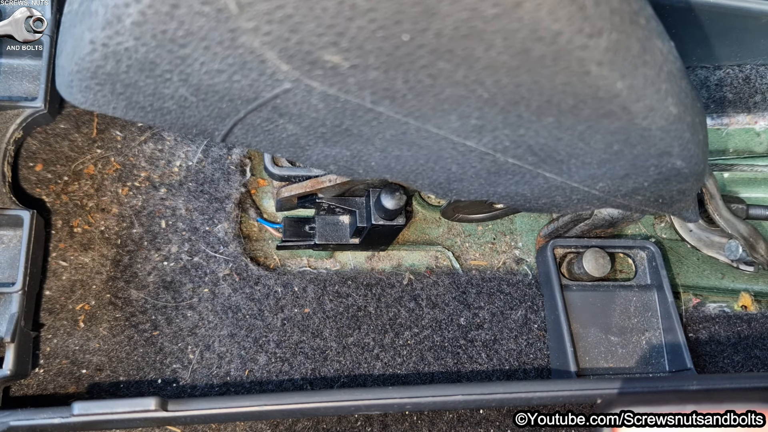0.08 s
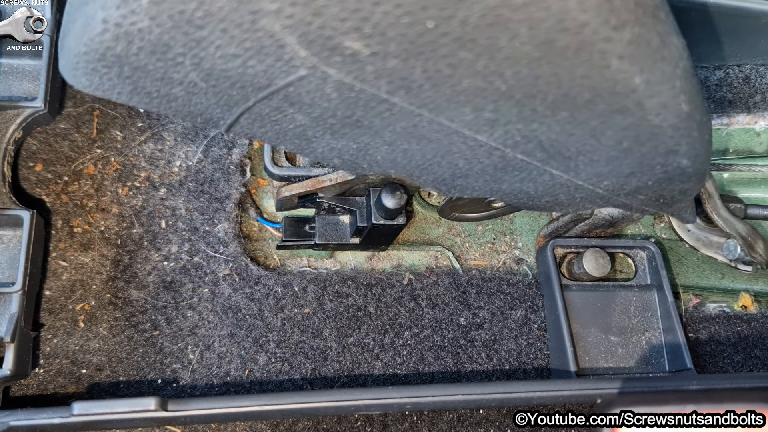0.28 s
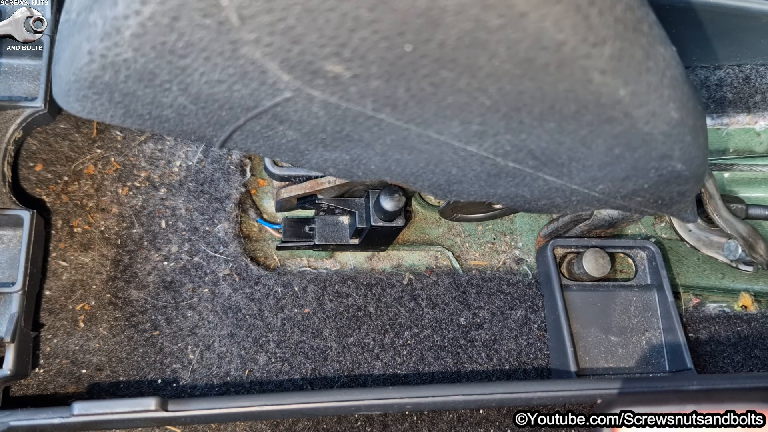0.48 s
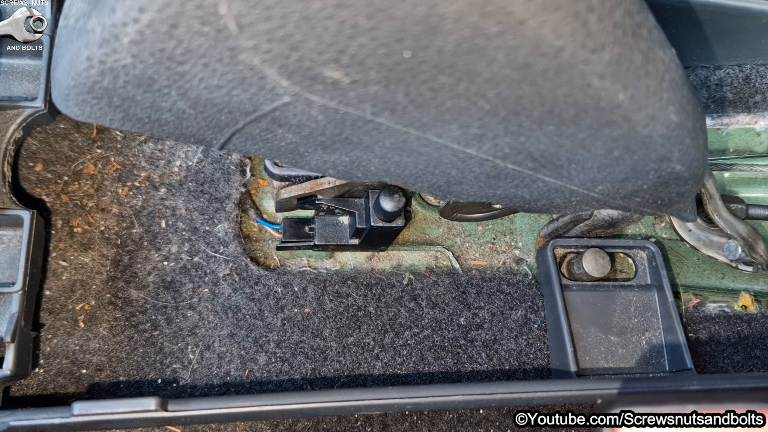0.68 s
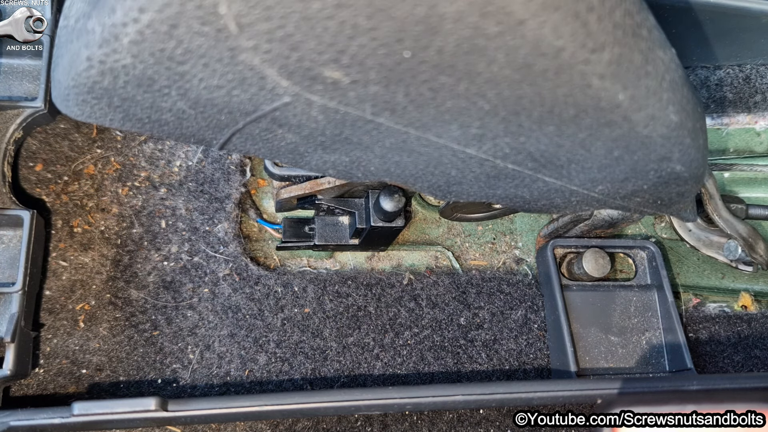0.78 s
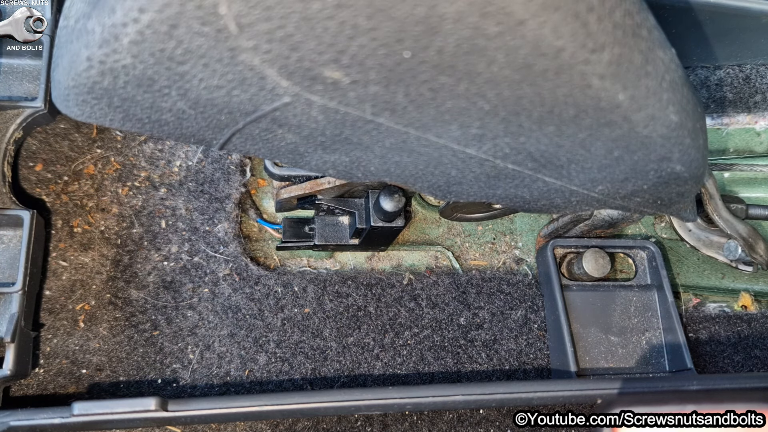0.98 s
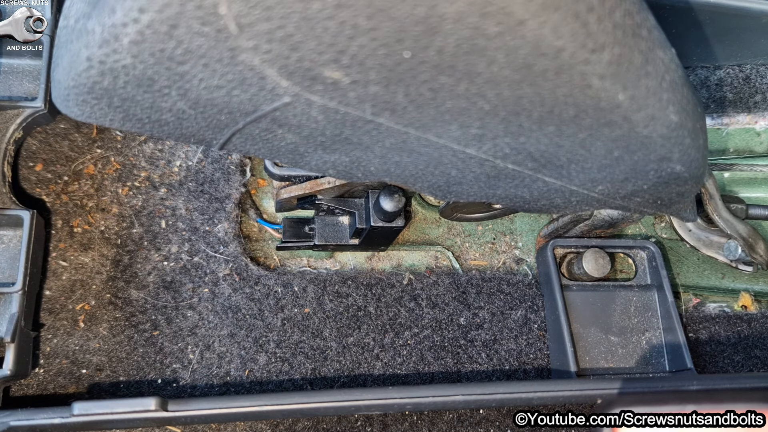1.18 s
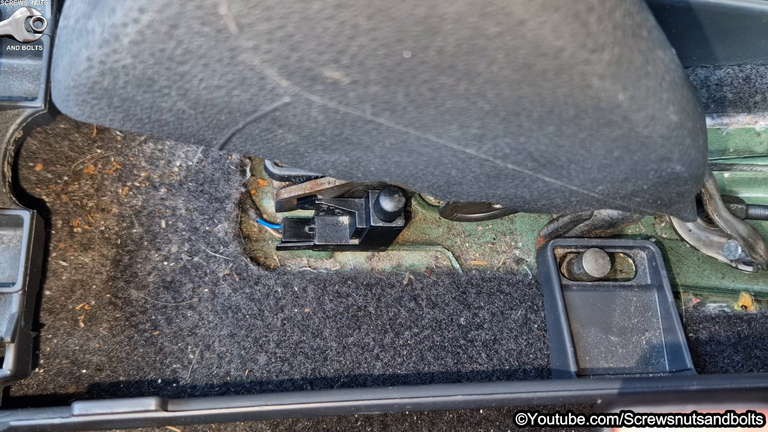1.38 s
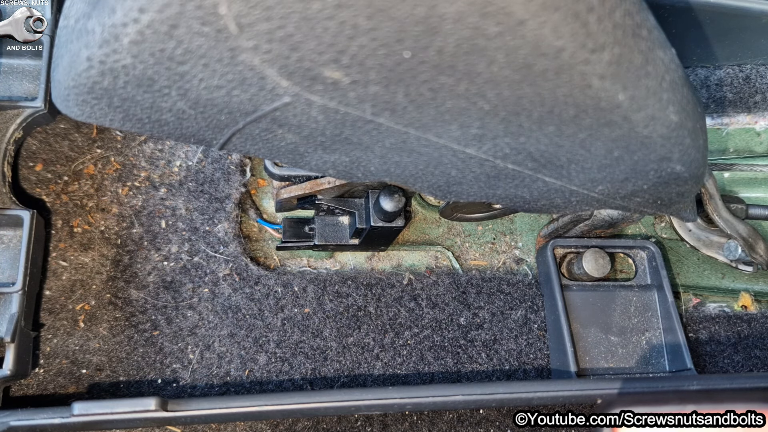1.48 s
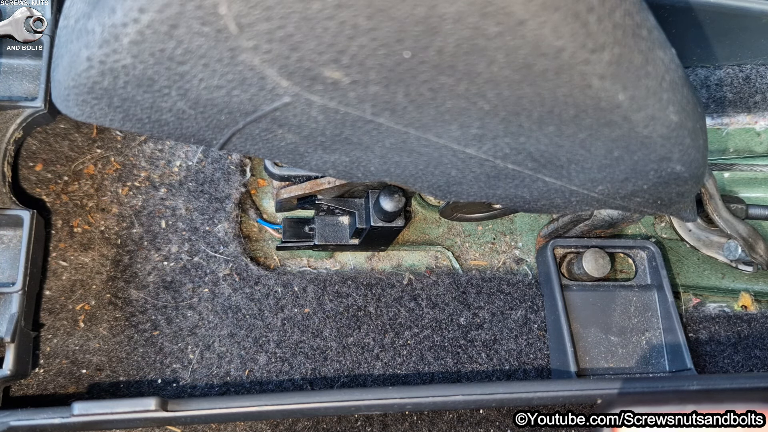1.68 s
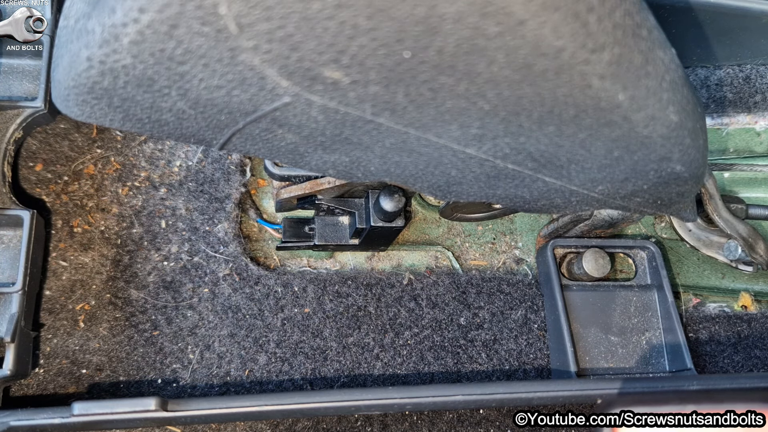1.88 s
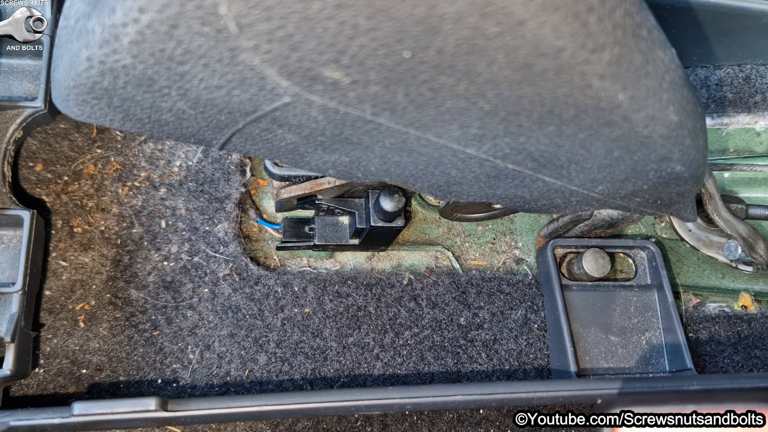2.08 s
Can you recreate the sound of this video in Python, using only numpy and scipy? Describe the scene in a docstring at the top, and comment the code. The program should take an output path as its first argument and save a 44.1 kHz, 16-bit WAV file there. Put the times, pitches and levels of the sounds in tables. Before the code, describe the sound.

A car handbrake lever snaps with a loud, sharp double metallic clack and short thud, then a duller knock, then a few faint cable and linkage ticks, heard close in a small quiet cabin.

```python
"""A car handbrake lever is worked, heard close up from the floor of the cabin.
Pawl, sector, stop, cable and link click as noise bursts shaped by each part's resonances, with a cabin tail;
damped low pushes thud into the modes of the floor pan. Sliding friction is swelling, grainy noise,
and friction in the lever mount is narrow-band low noise. Beneath lie a drifting rumble and steady hiss."""
import sys
import numpy as np
from scipy import signal
from scipy.fft import rfft, irfft
from scipy.io import wavfile
from scipy.ndimage import uniform_filter1d

SR = 44100
rng = np.random.default_rng(int(sys.argv[2]) if len(sys.argv) > 2 else 0)


def master_out(mix):
    """Clip the mix to full scale and print it as 16-bit PCM to the path in sys.argv[1]."""
    frames = np.transpose(np.atleast_2d(mix))
    ceiling = np.clip(frames, -1, 1)
    pcm = np.round(ceiling * 32767).astype(np.int16)
    wavfile.write(sys.argv[1], SR, pcm)


N = 92610  # samples in the scene

# corner frequencies of the tonal balance of clicks and rubbing
BODY_HZ, MID_HZ, TREBLE_HZ, TOP_HZ = 574, 2020, 6800, 12300


def amp(db):
    """Logarithmic level: converts decibels to a gain in amplitude."""
    return 10 ** (np.asarray(db) / 20)


def evened(x):
    """Power normalisation: scales to unit rms."""
    return x / np.sqrt(np.mean(x ** 2) + 1e-20)


def read(points, hz):
    """Logarithmic pitch: interpolates a table along a log-frequency axis."""
    f, value = np.transpose(points)
    return np.interp(np.log(hz + 1), np.log(f + 1), value)


def add(mix, start_s, sound):
    """Superposition: adds a sound to the mix from a given time, cut at the end of the mix."""
    part = mix[:, round(start_s * SR):][:, :sound.shape[-1]]
    part += sound[..., :part.shape[1]]


def noise(size):
    """Spatial coherence: white-noise spectra at two microphones, most alike in the bass."""
    # likeness of left and right: hz, correlation
    likeness = [(30, 1), (250, .97), (620, 0.64), (1300, -0.18), (2600, -.25), (5000, .15), (16000, .05)]
    hz = np.fft.rfftfreq(size, 1 / SR)
    a, b = rfft(rng.standard_normal((2, size)))
    same = np.clip(read(likeness, hz), -1, 1)
    mid = a * np.sqrt((1 + same) / 2)
    side = b * np.sqrt((1 - same) / 2)
    return hz, np.array([mid + side, mid - side])


def rings(part, hz):
    """Modal resonance: summed peaks and dips of one part, in decibels."""
    # resonances of each part: centre_hz, width_hz, boost_db
    resonances = {"pawl": [(370, 74, 3), (1390, 510, 11.5), (2700, 190, 1.5), (3580, 110, 13),
                  (4060, 420, 1.5), (4950, 250, 14.5), (5900, 210, 5.5), (6200, 500, -7.5), (7500, 500, 8)],
                  "sector": [(665.2, 140, 8.5), (913, 70, 7), (1403, 300, 4.5), (2200, 200, 7),
                  (3127, 510, 6), (3240, 58, 5), (4600, 400, -0.5), (5639, 73, 7), (6400, 180, 7),
                  (7992, 360, -1), (12000, 590, 9)], "stop": [(593, 135, 4), (1244, 160, 6.5),
                  (1636, 115, 7.5), (1896, 210, 11.5), (2920, 570, 10), (3880, 160, -12), (4100, 240, 19),
                  (5610, 155, 10.5), (6300, 220, -4), (7520, 210, 14.5)], "cable": [(656, 99, 15),
                  (1190, 110, 14), (2130, 1240, -20), (2850, 370, 20.5), (3316, 415, -10), (4030, 67, 13.5),
                  (4200, 130, 14), (4660, 320, -25.5), (5530, 220, 8.5), (7700, 720, 12), (8580, 405, 6)],
                  "link": [(1282, 74, 11), (1650, 120, 15.5), (1874, 305, -37), (2266, 310, 23),
                  (3180, 250, 5.5), (4150, 240, 11.5), (7450, 800, 9.5), (9600, 900, 4)],
                  "trim": [(1407, 200, 10), (1620, 170, 15), (2600, 250, -15.5), (4375, 230, -4),
                  (5404, 200, 6.5), (6444, 250, -9)]}
    return sum(db / (1 + (2 * (hz - f) / width) ** 2) for f, width, db in resonances[part])


def strike(z, envelope):
    """Energy normalisation: noise of spectrum z under an envelope, at a power set by the two."""
    wave = irfft(z)
    return evened(wave * envelope) * np.sqrt(np.mean(wave ** 2) * np.mean(envelope ** 2))


def rumble():
    """Broadband noise: a low rumble drifts in level under a steady trace of hiss."""
    # relative spectrum per hertz: hz, level_db
    spectrum = [(20, -11), (50, -1.5), (72, -3.5), (105, -20.5), (150, -26), (240, -28.5), (330, -37.5),
                (480, -45.5), (620, -38.5), (1050, -44.5), (1700, -43), (2200, -48.5), (4000, -55),
                (8000, -63), (16000, -67.5)]
    # drift of the low part: time_s, gain_db
    drift_points = [(0, -56.5), (0.399, -52.5), (.62, -51.5), (.76, -59), (1.1, -51.5), (1.45, -55),
                    (1.65, -59.5), (1.901, -60), (2.05, -49.5)]
    edge_hz, hiss_gain_db = 200, -55
    hz, z = noise(size=N)
    z = z * evened(amp(read(spectrum, hz)))
    low = 1 / (1 + (hz / edge_hz) ** 2)
    drift = amp(np.interp(np.arange(N) / SR, *np.transpose(drift_points)))
    hiss = amp(hiss_gain_db) * irfft(z * (1 - low), N)
    return drift * irfft(z * low, N) + hiss


def groan(peak_s, half_s, gain_db, centre_hz):
    """Structure-borne friction: dull narrow-band noise carried by the floor pan swells and fades."""
    width_oct = 0.4  # standard deviation of the band
    hz, z = noise(size=N)
    band = np.exp(-.5 * (np.log2((hz + 1) / centre_hz) / width_oct) ** 2)
    swell = np.exp(-.5 * ((np.arange(N) / SR - peak_s) / half_s) ** 2)
    return evened(irfft(z * band, N)) * amp(gain_db) * swell


def rub(turn_s, part, rise_s, fall_s, gain_db, body_db):
    """Sliding friction: grainy noise, coloured by the part, swells and dies away."""
    # relative spectrum per hertz: hz, level_db
    spectrum = [(60, -10), (300, 4), (900, -2), (1600, 1.5), (2600, -1.5), (4000, -2), (8000, -3),
                (11000, -8.5), (16000, -7.5)]
    ring_share = .5  # share of the part's resonances, in decibels
    grain_db, grain_s = 2, .003  # rms fluctuation in level, averaging time
    hz, z = noise(size=N)
    t = np.arange(N) / SR - turn_s
    colour = evened(amp(read(spectrum, hz) + ring_share * rings(part, hz)))
    balance = amp(read([(BODY_HZ, body_db), (TREBLE_HZ, 0)], hz))
    grain = evened(uniform_filter1d(rng.standard_normal(N), max(1, round(grain_s * SR))))
    # exponential rise before the turn and exponential fall after it, joined smoothly
    swell = 2 * np.exp(-np.logaddexp(-t / rise_s, t / fall_s))
    return irfft(z * colour * balance, N) * swell * amp(gain_db + grain_db * grain)


def thud(gain_db, push_hz, t60_s):
    """Modal excitation: a damped push through the lever mount wakes pan modes, most near its pitch."""
    # floor pan and cabin modes: mode_hz, relative_db, t60_s
    modes = [(44, -11.5, .6), (66, -17.5, 0.62), (96.6, -11, .28), (142, -15, .3), (190.5, -7.5, .21),
             (237.4, -7, 0.17), (285, -11, 0.16), (329, -20.5, .19), (369, -20.5, .17), (632, -28.5, .16)]
    pan_gain_db, spread_oct, build_s = -6.5, 2.8, 0.055
    t = np.arange(SR) / SR
    onset = np.minimum(t * push_hz * 2, 1)  # full after half a cycle
    push = np.sin(2 * np.pi * push_hz * t) * amp(-60 * t / t60_s) * onset
    pan = 0
    for f, db, decay_s in modes:
        coupling = 1 / (1 + (np.log2(f / push_hz) / spread_oct) ** 2)
        pan = pan + coupling * amp(db - 60 * t / decay_s) * np.sin(2 * np.pi * f * t)
    build = 1 - np.exp(-t / build_s)
    return amp(gain_db) * (push + amp(pan_gain_db) * pan * build)


def click(part, gain_db, body_db, treble_db, top_db, t60_s, left_right_db):
    """Impact: steel strikes steel, dense modes ring briefly, then the cabin carries a faint tail."""
    # relative spectrum of the steel per hertz: hz, level_db
    steel = [(40, -24.5), (150, -3), (330, 8), (700, 4.5), (1050, -3.5), (1400, -0.5), (2500, -5),
             (4000, -4.5), (6200, -0.5), (9500, -9), (12000, -14), (16000, -15)]
    # cabin tail before its decay: hz, relative_db
    cabin_level = [(150, -12), (500, -21.5), (2000, -21), (6000, -29.5), (14000, -26.5)]
    # decay of the cabin tail: hz, t60_s
    cabin_decay = [(150, .27), (500, .16), (2000, .17), (6000, .135), (14000, .11)]
    attack_s, body_attack_s = .0005, .001  # the second is added in the bass
    body_ring = 1.3  # the ring lasts longer in the bass by up to this factor
    crack_gain, crack_s = 0.63, .0007  # the first contact stands out above the ring
    tail_ring = .4  # share of the part's resonances, in decibels, heard in the tail

    hz, z = noise(size=16384)
    t = np.arange(2 * (len(hz) - 1)) / SR
    balance = [(BODY_HZ, body_db), (MID_HZ, 0), (TREBLE_HZ, treble_db), (TOP_HZ, top_db)]
    z = z * amp(read(balance, hz))
    near = z * evened(amp(read(steel, hz) + rings(part, hz)))
    far = z * evened(amp(read(steel, hz) + tail_ring * rings(part, hz)))

    centres = np.geomspace(125, 16000, 8)
    out = 0
    for f, share in zip(centres, np.eye(len(centres))):
        band = read(np.c_[centres, share], hz)  # overlapping triangular bands that sum to one
        heavy = 1 / (1 + (f / BODY_HZ) ** 2)  # near one in the bass, zero in the treble
        rise = np.minimum(t / (attack_s + body_attack_s * heavy), 1)
        ring = amp(-60 * t / (t60_s * (1 + (body_ring - 1) * heavy)))
        crack = 1 + crack_gain * (1 - heavy) * np.exp(-t / crack_s)
        tail = amp(read(cabin_level, f) - 60 * t / read(cabin_decay, f))
        direct = strike(near * band, rise * ring * crack)
        reverberant = strike(far * band, rise * (1 - ring) * tail)
        out = out + direct + reverberant
    return out * amp(gain_db + np.array([[left_right_db], [-left_right_db]]) / 2)


def scene():
    """Superposition of sources: clicks, thuds and friction over the rumble."""
    # low rubbing of the lever in its mount: peak_s, half_s (standard deviation), gain_db, centre_hz
    groans = [(0.18, 0.0057, -58, 310), (0.433, 0.033, -61, 240), (0.96, 0.093, -63, 231),
              (1.657, 0.15, -70.5, 142.4), (0.62, 0.034, -47, 59)]
    # rubbing strokes: turn_s (from rise to fall), part, rise_s, fall_s, gain_db, body_db
    rubs = [(0.216, "pawl", 0.021, 0.005, -64.5, 11.5), (0.251, "sector", .009, .003, -29, -1),
            (0.489, "stop", 0.0072, 0.0051, -62.5, 16), (0.907, "cable", 0.023, 0.014, -61.5, -3),
            (.948, "cable", 0.005, .015, -65.5, 3.5), (0.997, "link", 0.0045, .012, -56, -42),
            (1.032, "link", 0.026, 0.037, -66, 4.5), (1.598, "trim", 0.018, 0.027, -61.5, -6.5),
            (1.71, "trim", 0.034, 0.041, -74, 1)]
    # blows into the floor pan: start_s, gain_db, push_hz, t60_s
    thuds = [(.2148, -26, 380, 0.019), (0.2355, -12, 300, 0.025), (0.2441, -22, 260, 0.06),
             (0.252, -11.5, 235, 0.028), (0.2784, -27.5, 230, 0.058), (0.4919, -25.5, 420, 0.016),
             (0.4974, -22, 103.2, 0.092), (0.896, -38.5, 108, 0.16), (.953, -48, 229, 0.11),
             (1.082, -33.5, 230, 0.036)]
    # clicks: start_s, part, gain_db, body_db, treble_db, top_db, t60_s (treble ring), left_right_db
    clicks = [(.1688, "pawl", -39.5, -33.5, 1.5, -4, 0.015, -6.5),
              (0.2145, "pawl", -15, 3, 1.5, -5, 0.027, -3), (.249, "sector", -8.5, -5, 4.5, 5, 0.042, -2),
              (.4876, "stop", -23.5, 0, -11.5, -20.5, 0.036, -1.5),
              (.5205, "stop", -54, -16, -5.5, -24, 0.044, 2),
              (.838, "cable", -63.5, 1.5, -3, -12, 0.063, 1),
              (.882, "cable", -45, 5, -2.5, -14, 0.028, 3.5), (.912, "cable", -57, -8, 6, -9, 0.018, 7),
              (0.9518, "link", -47, -7.5, -1, 4, 0.014, 7.5),
              (1.0275, "link", -52.5, 6, 2.5, 14, 0.072, 3.5),
              (1.0392, "link", -41, 3, -8.5, 7, 0.027, 0.5),
              (1.0809, "link", -38.5, 3, -10.5, 5.5, 0.038, 0)]
    mix = rumble()
    for row in groans:
        mix += groan(*row)
    for row in rubs:
        mix += rub(*row)
    for start_s, *row in thuds:
        add(mix, start_s, thud(*row))
    for start_s, *row in clicks:
        add(mix, start_s, click(*row))
    return mix


def record(dry):
    """Transduction: each microphone has its own colour, the highest peaks clip, then the band is limited."""
    # balance of the microphones: hz, left_right_db
    mic_balance = [(200, 1), (380, 3), (700, 0.5), (1290, 2), (2400, 3), (4400, 1.5), (7500, 0.5),
                   (11000, 5.5)]
    ceiling, edge_hz = .88, 16100  # clipping amplitude, low-pass edge
    tilt = read(mic_balance, np.fft.rfftfreq(2 * N, 1 / SR)) / 2
    heard = irfft(rfft(dry, 2 * N) * amp([tilt, -tilt]))[:, :N]
    clipped = np.clip(heard, -ceiling, ceiling)
    low_pass = signal.firwin(255, edge_hz, window=("kaiser", 8), fs=SR)
    return signal.oaconvolve(clipped, low_pass[None], "same")


dry = scene()
out = record(dry)
master_out(out)
```